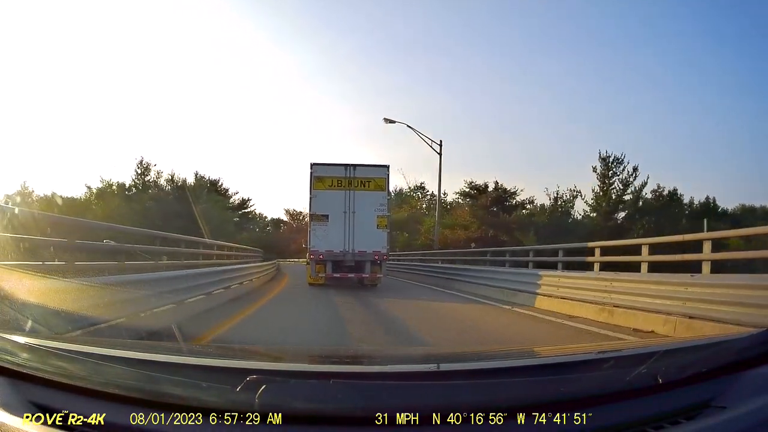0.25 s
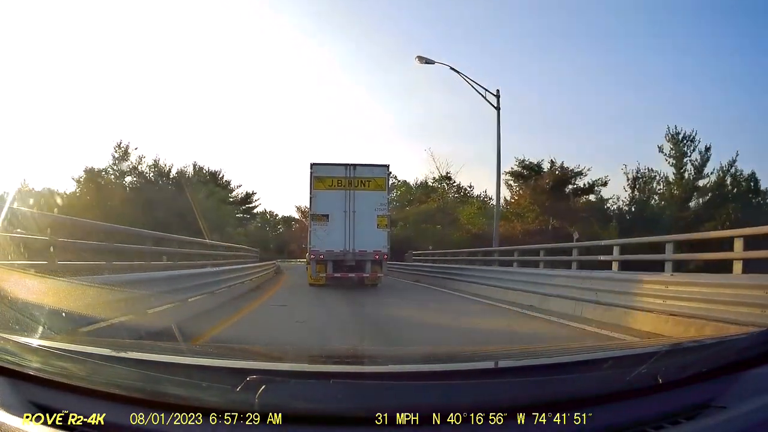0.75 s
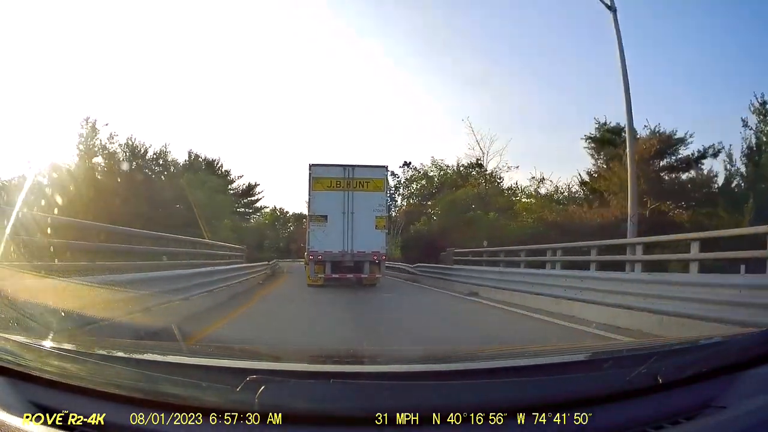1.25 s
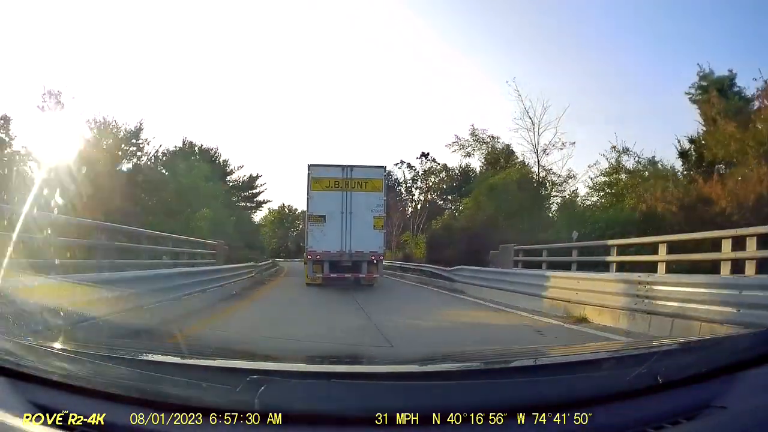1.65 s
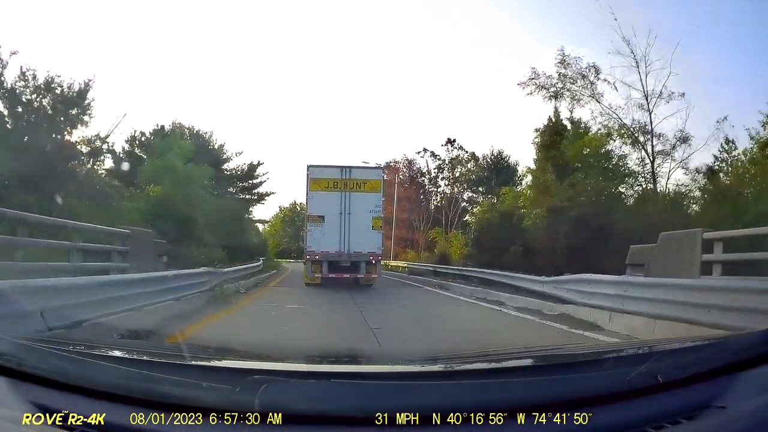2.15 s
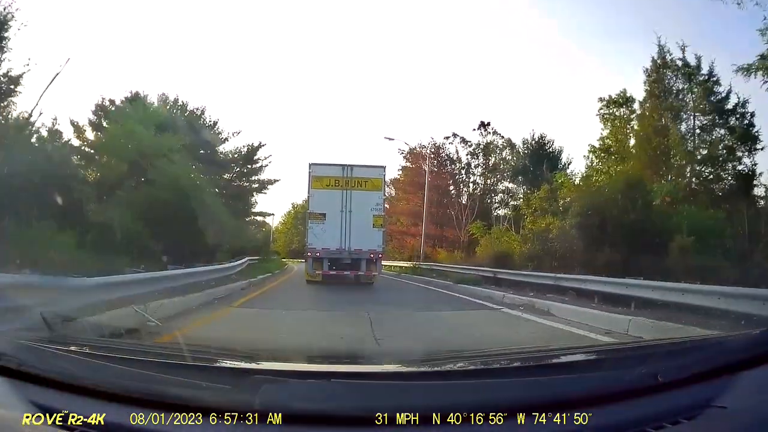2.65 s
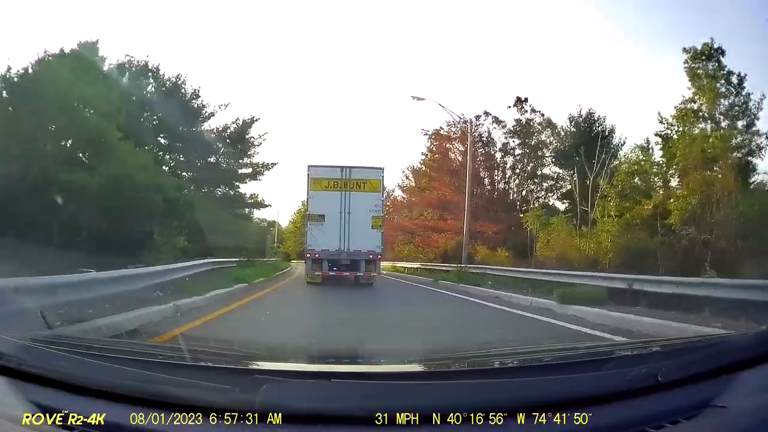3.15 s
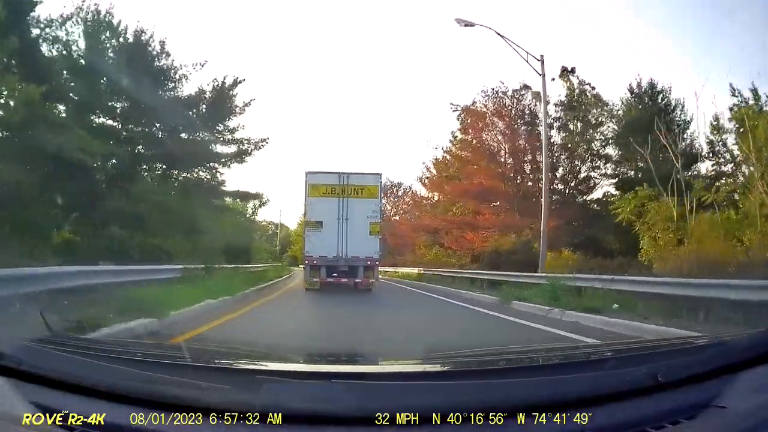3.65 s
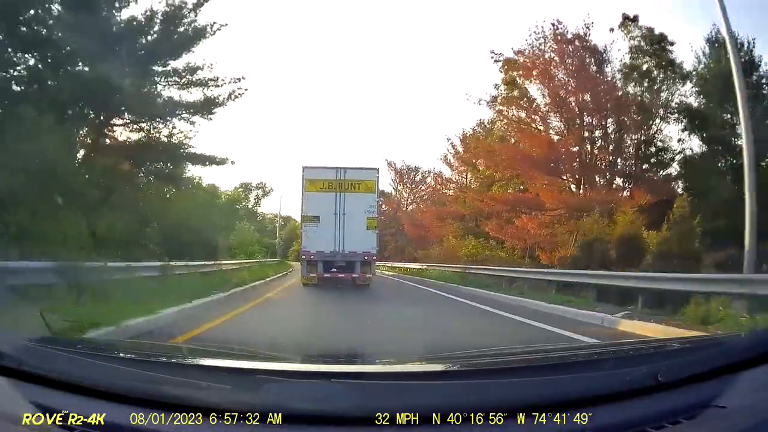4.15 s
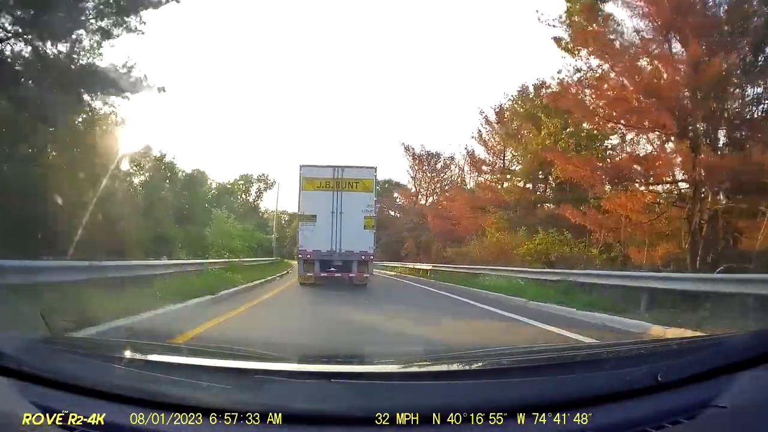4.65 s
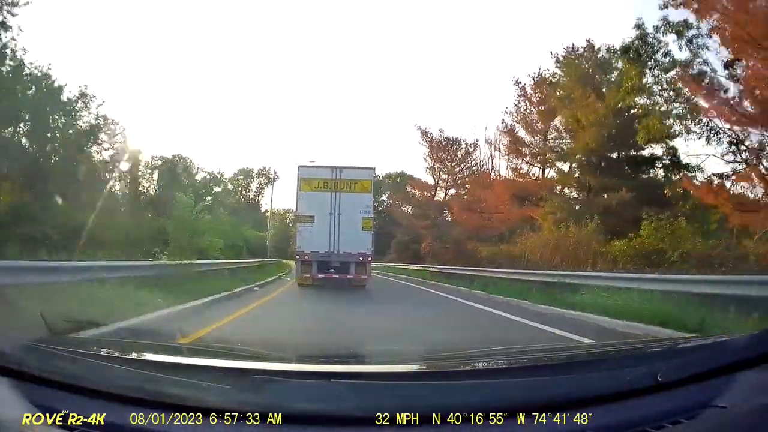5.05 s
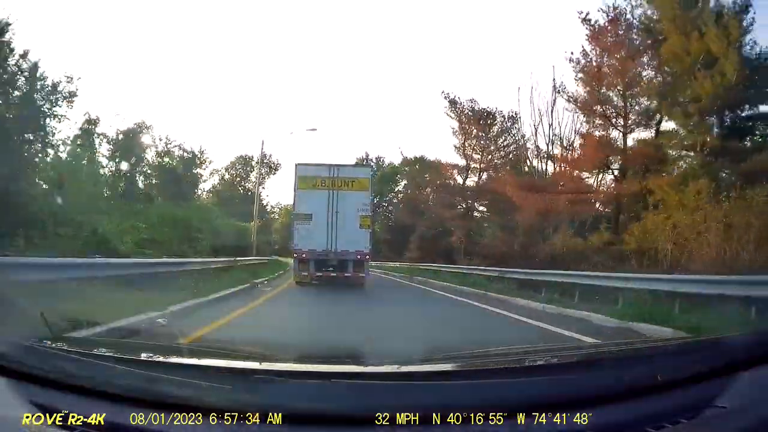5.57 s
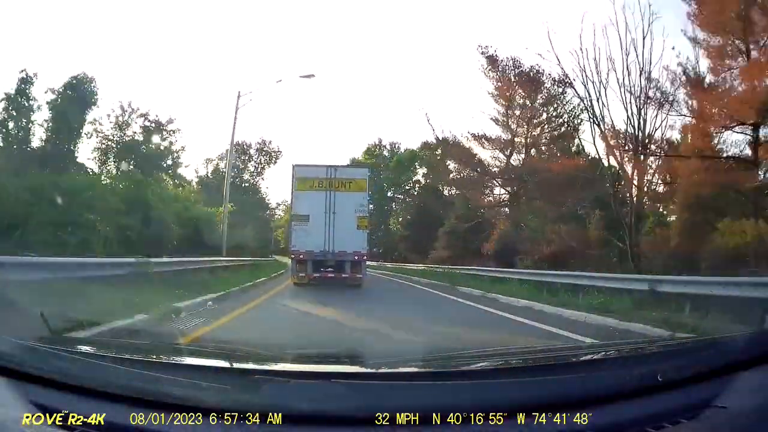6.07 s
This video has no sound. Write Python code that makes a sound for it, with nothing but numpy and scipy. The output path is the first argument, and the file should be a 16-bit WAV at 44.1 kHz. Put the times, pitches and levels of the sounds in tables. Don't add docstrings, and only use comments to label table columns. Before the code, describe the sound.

A steady car ride at moderate speed, close cabin sound. Coarse, bass-heavy rumble shakes the floor and panels, with light trim ticks and a hollow knock at two seconds. Several strong low thumps follow in quick succession, then the road turns smooth and the roar falls away to gentle tyre noise, faint wind and thin electronic hiss, with a sinking engine hum and a slight high whine.

```python
import sys
import numpy as np
from scipy import signal
from scipy.fft import rfft, irfft
from scipy.io import wavfile
from scipy.ndimage import uniform_filter1d

SR = 44100
rng = np.random.default_rng(int(sys.argv[2]) if len(sys.argv) > 2 else 0)


def dump(signal):
    limited = np.clip(np.atleast_2d(signal).T, -1, 1)
    pcm = np.round(limited * 32767).astype(np.int16)
    wavfile.write(sys.argv[1], SR, pcm)


def decibels_to_gain(level_db):
    exponent = np.asarray(level_db, float) / 20
    return 10 ** exponent


N = 278271
TIME, HZ = np.arange(N) / SR, np.fft.rfftfreq(N, 1 / SR)

# pitch_hz, width_hz, level_db
BOOM_MODES = [(31.1, 13.7, -3.5), (40.6, 5.8, 5)]
FLOOR_MODES = [(62.3, 3.64, 9.1), (87.3, 10.8, 3.7)]
SUBFRAME_MODES = [(104.2, 8.7, -0.5), (126.9, 12.7, -1.5), (162.4, 24.2, -2.5), (185.3, 23.3, -2.5),
                  (199, 13.4, -6.5)]
PANEL_MODES = [(248, 34.4, -6), (299.5, 37.3, -2), (317, 17.8, 2), (345.5, 30.7, -2.5)]
TYRE_AIR_MODES = [(206.5, 14.3, -4.5), (221.3, 7.6, 3)]
TREAD_MODES = [(423, 96, 1), (571, 142, 1), (671.7, 41, 4), (848, 43, -2), (944.6, 39.5, 2),
               (1032, 63, -1.5), (1083.4, 29.5, 3.5), (1179, 60, -4.5), (1316, 96, -3), (1487, 163, -9.5),
               (1665, 122, -11.5), (801, 63, -5)]
# time_s, coarseness (1 = brushed concrete, 0 = smooth asphalt)
SURFACE = [(0, 0.96), (.5, 0.93), (1.0, 0.94), (1.6, 1.05), (2.0, 1.02), (2.6, 0.81), (3.0, 1.01),
           (3.45, 0.62), (3.62, .3), (4.1, 0.16), (4.7, 0.18), (5.3, 0.021), (5.8, -0.0087), (6.31, -0.018)]
PATHS = {"boom": (43.7, -45.5, -38), "floor": (76.7, -45, -38.5), "frame": (137, -46.5, -38),
         "panels": (314, -49.5, -41), "cavity": (191, -53, -44), "tread": (900, -45, -40.5)}
# peak_s, length_s, peak_db, pitch_hz
PATCHES = [(0.073, .08, -29, 41), (0.1, 0.028, -30.5, 134), (0.307, 0.1, -28, 46), (0.456, 0.039, -37, 135),
           (0.726, 0.034, -29, 95), (1.263, 0.07, -32.5, 133), (1.333, 0.059, -27, 55.4),
           (1.524, .06, -28, 43), (1.537, .08, -26, 69.6), (1.71, 0.13, -33.5, 81),
           (2.104, 0.084, -33, 116), (2.271, 0.037, -24.5, 76), (2.484, .05, -37, 54),
           (2.626, 0.04, -40, 135), (2.754, .05, -33, 93), (2.805, .04, -34.5, 41), (3.62, 0.086, -38, 50),
           (4.256, 0.024, -37, 41), (4.568, 0.036, -43.5, 134), (4.762, 0.053, -37, 58),
           (4.865, .04, -37, 90), (5.005, 0.12, -32.5, 41), (5.017, 0.038, -41, 119),
           (5.25, 0.073, -36.5, 41), (5.58, .04, -42, 41), (5.69, 0.052, -38, 54.6),
           (5.9, 0.069, -43.5, 72), (6.038, 0.026, -34, 68), (6.15, 0.024, -43, 135)]
# peak_s, length_s, peak_db, pitch_hz
JOINT_SWINGS = [
    (2.868, 0.042, -26.5, 80),
    (2.907, 0.073, -24, 43),
    (3.065, 0.042, -26, 121),
    (3.112, .04, -25.5, 65),
    (3.13, 0.083, -26, 41),
    (3.295, 0.048, -25.5, 72),
    (3.307, 0.087, -24.5, 41),
    (3.483, 0.026, -33, 135),
    (3.511, 0.026, -23.5, 45),
]
# peak_s, length_s, peak_db, pitch_hz
RIDGES = [(0.195, 0.033, -32, 225), (.36, 0.1, -35, 230), (0.465, 0.045, -38, 310), (0.945, 0.17, -39, 223),
          (.97, .05, -37, 345), (1.145, 0.044, -37, 340), (1.15, 0.032, -38, 221), (1.434, .14, -33, 224),
          (1.617, .06, -36.5, 220), (1.732, 0.044, -32, 224), (2.0, 0.022, -40, 220),
          (2.244, 0.061, -35.5, 238), (2.518, 0.034, -39, 218), (2.644, 0.029, -35, 250),
          (2.78, .03, -38, 222), (2.89, .06, -32.5, 230), (3.064, 0.12, -33, 236), (3.313, 0.088, -34, 215),
          (3.518, 0.036, -45, 250), (4.036, 0.083, -43, 219), (4.765, .05, -45.5, 320),
          (5.205, 0.046, -45, 220), (5.888, .05, -45, 220)]
SWING = {"patch": (0.65, .55), "joint": (0.33, 0.61), "ridge": (0.53, 0.46)}
# time_s, level_db
WIND_LEVEL = [(0, -60), (1, -61), (2, -60), (2.5, -60.5), (3.5, -60.5), (4.5, -61), (5.3, -62),
              (6.31, -61.5)]
# pitch_hz, level_db
WIND_COLOUR = [(1200, -5.5), (1900, 2), (2400, -0.5), (2700, 2), (3300, -3), (3800, -10), (5000, -14.5),
               (8000, -43)]
# pitch_hz, level_db
HISS_COLOUR = [(500, 6), (3000, 2), (5500, -1.5), (9000, -4.5), (13000, -6.5), (14800, -7), (15500, -14),
               (15800, -22)]
# pitch_hz, silent_share (0-1)
HISS_GAPS = [(9000, 0), (10500, .05), (12000, .11), (13000, .24), (14800, .22), (15400, .3), (15700, .55)]
# start_s, peak_db, centre_hz, width (share of centre), length_ms
TICKS = [(.317, -39, 900, .8, 3.3), (1.549, -52, 2500, 0.46, 5), (2.13, -60, 3400, 0.46, 50),
         (2.189, -55.5, 3270, 0.3, 120), (2.24, -66, 4600, .4, 70), (2.861, -34, 1090, 0.59, 15),
         (2.866, -52, 2800, 0.35, 16), (3.102, -56, 3000, .6, 7.1), (3.331, -54, 4200, 0.88, 5),
         (3.341, -50, 2600, .7, 8.7), (3.496, -52, 4800, 0.38, 12), (3.506, -54, 5000, .4, 24),
         (3.497, -52, 3000, 0.6, 32), (3.516, -55, 7800, .7, 3), (4.769, -51, 7800, .9, 1.6)]
# start_s, peak_db, contact_ms
BUMPS = [(1.277, -25, 6.6), (1.534, -24, 5.3), (1.945, -37, 6), (1.992, -24, 6.9), (2.075, -23, 9.8),
         (2.096, -26, 6.1), (2.272, -28, 5.2), (2.861, -16.5, 6.4), (3.051, -20, 4.7), (3.092, -13, 5.3),
         (3.291, -19, 5), (3.505, -20.5, 6.1), (4.94, -32, 7.9)]
# start_s, peak_db, pitch_hz, ring_ms
KNOCKS = [
    (2.018, -28.5, 570, 15),
    (2.022, -31, 470, 11),
    (2.029, -25, 355, 18),
]
# time_s, firing_hz, level_db
ENGINE = [
    (3.55, 60, -70),
    (3.7, 60, -43),
    (4.0, 58.5, -43),
    (4.15, 55.5, -48),
    (4.3, 52.5, -50),
    (4.6, 48.5, -51),
    (4.8, 48, -70),
]
# time_s, pitch_hz, level_db
WHINE = [
    (4.8, 1718, -78),
    (4.92, 1722, -65),
    (5.1, 1729, -66),
    (5.4, 1734, -65),
    (5.52, 1733, -67),
    (5.62, 1733, -80),
]


def level(x, db):
    return x * decibels_to_gain(db) / np.sqrt(np.mean(x ** 2))


def curve(table):
    s, *columns = np.transpose(table)
    return [np.interp(TIME, s, column) for column in columns]


def walk(rate_hz):
    hold = int(SR / rate_hz)
    steps = np.repeat(rng.standard_normal(N // hold + 1), hold)
    smooth = uniform_filter1d(uniform_filter1d(steps, hold), hold)
    return 1.02 * smooth[:N]


def ring(x, modes):
    gain = 0
    for k, (hz, width_hz, db) in enumerate(modes):
        damping = 1j * HZ * width_hz
        gain = gain + (-1) ** k * decibels_to_gain(db) * damping / (hz ** 2 - HZ ** 2 + damping)
    return irfft(rfft(x) * gain, N)


def coloured(points):
    hz, db = np.transpose(points)
    gain = decibels_to_gain(np.interp(np.log(HZ + 1), np.log(hz), db))
    return irfft(rfft(rng.standard_normal(N)) * gain, N)


def path_db(name, patchy_db):
    hz, asphalt_db, concrete_db = PATHS[name]
    coarseness = curve(SURFACE)[0]
    bed_db = asphalt_db + (concrete_db - asphalt_db) * coarseness + patchy_db * walk(9)
    grid = TIME[::64]
    swells = 0
    for table, (rise, reach_octaves) in zip((PATCHES, JOINT_SWINGS, RIDGES), SWING.values()):
        s, length_s, db, shake_hz = np.transpose(table)[..., None]
        age = (grid - s) / length_s / np.where(grid < s, rise, 1)
        distance = np.log2(shake_hz / hz) / reach_octaves
        swells = swells + np.sum(decibels_to_gain(db) ** 2 * np.exp(-age ** 2 - 2 * distance ** 2), axis=0)
    return 10 * np.log10(decibels_to_gain(bed_db) ** 2 + np.interp(TIME, grid, swells))


def shaken(modes, db, steady):
    x = ring(rng.standard_normal(N), modes)
    window = SR // 30
    swell = uniform_filter1d(uniform_filter1d(x ** 2, window), window)
    evened = x / (swell + 1e-12) ** (np.clip(steady, 0, 1) / 2)
    return level(evened, db)


def road():
    boom = shaken(BOOM_MODES, path_db("boom", 3.6), steady=1.0)
    floor = shaken(FLOOR_MODES, path_db("floor", 2.8), steady=0.9)
    subframe = shaken(SUBFRAME_MODES, path_db("frame", 1.3), steady=0.46)
    panels = shaken(PANEL_MODES, path_db("panels", 1.1), steady=0.22)
    tyre_air = shaken(TYRE_AIR_MODES, path_db("cavity", 2.6), steady=0.7)
    tread = shaken(TREAD_MODES, path_db("tread", 0.19), steady=0.055)
    lining = signal.butter(3, 2600, fs=SR, output="sos")
    return signal.sosfilt(lining, boom + floor + subframe + panels + tyre_air + tread)


def wind():
    flutter_db = 0.5 * walk(9)
    return level(coloured(WIND_COLOUR), curve(WIND_LEVEL)[0] + flutter_db)


def starve(x):
    hz, _, cells = signal.stft(x, SR, nperseg=2048, noverlap=1536)
    rows, columns = cells.shape
    chance = rng.random((rows // 5 + 1, columns // 5 + 1))
    chance = np.repeat(np.repeat(chance, 5, axis=0), 5, axis=1)[:rows, :columns]
    keep = chance > np.interp(hz, *np.transpose(HISS_GAPS))[:, None]
    return signal.istft(cells * keep, SR, nperseg=2048, noverlap=1536)[1][..., :N]


def camera_hiss():
    return starve(level(coloured(HISS_COLOUR), -62.5))


def trim():
    out = np.zeros(N)
    size = SR // 4
    for s, db, hz, share, ms in TICKS:
        noise, jumps = rng.standard_normal((2, size))
        chatter = decibels_to_gain(2.2 * np.repeat(jumps, SR // 400)[:size])
        burst = noise * chatter * np.exp(-(TIME[:size] * 1000 / ms) ** 2)
        edges_hz = [hz / (1 + share / 2), hz * (1 + share / 2)]
        band = signal.butter(2, edges_hz, "bandpass", fs=SR, output="sos")
        make_up = np.sqrt(SR / 2 / (share * hz))
        out[int(s * SR):][:size] += decibels_to_gain(db - 5.5) * signal.sosfilt(band, burst) * make_up
    return out


def bumps():
    push = np.zeros(N)
    for s, db, ms in BUMPS:
        age = (TIME - s) / (ms / 1000)
        push += decibels_to_gain(db) * np.sin(np.pi * np.clip(age, 0, 1)) ** 2
    body = decibels_to_gain(9.5) * ring(push, BOOM_MODES) + decibels_to_gain(6.5) * ring(push, FLOOR_MODES)
    return body + ring(push, SUBFRAME_MODES) + ring(push, TYRE_AIR_MODES)


def knocks():
    out = np.zeros(N)
    for s, db, hz, ms in KNOCKS:
        age = np.clip(TIME - s, 0, 1)
        soft_start = 1 - np.exp(-age / 0.0031)
        out += decibels_to_gain(db) * soft_start * np.exp(-age * 1000 / ms) * np.sin(2 * np.pi * hz * age)
    return out


def engine():
    hz, db = curve(ENGINE)
    turn = 2 * np.pi * np.cumsum(hz * (1 + 0.004 * walk(8))) / SR
    return decibels_to_gain(db + 1.2 * walk(6)) * (np.sin(turn) + decibels_to_gain(-4) * np.sin(2 * turn))


def gear_whine():
    hz, db = curve(WHINE)
    fade = np.clip(np.minimum(TIME - WHINE[0][0], WHINE[-1][0] - TIME) / 0.06, 0, 1)
    loudness = np.sqrt(2) * fade * decibels_to_gain(db + 1.5 * walk(5.9))
    turn = 2 * np.pi * np.cumsum(hz * (1 + 0.00093 * walk(15))) / SR
    return loudness * np.sin(turn)


def scene():
    return (road() + wind() + trim() + bumps() + knocks() + engine() + gear_whine())[None]


def low_pass(x):
    return signal.sosfilt(signal.butter(12, 15610, fs=SR, output="sos"), x)


def record(dry):
    vent = signal.butter(2, 26.4, "highpass", fs=SR, output="sos")
    heard = signal.sosfilt(vent, dry)
    return low_pass(heard + camera_hiss())


dry = scene()
out = record(dry)
dump(out)
```